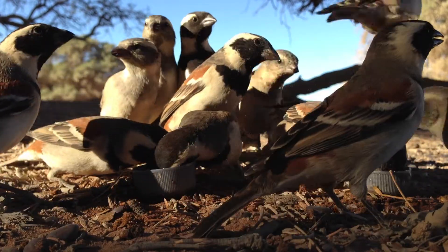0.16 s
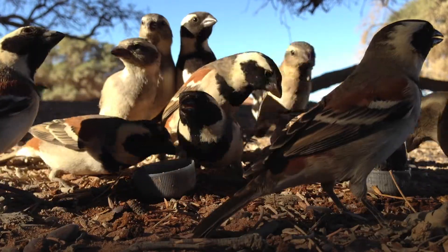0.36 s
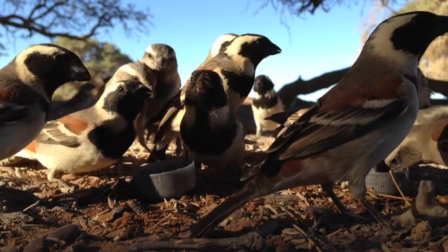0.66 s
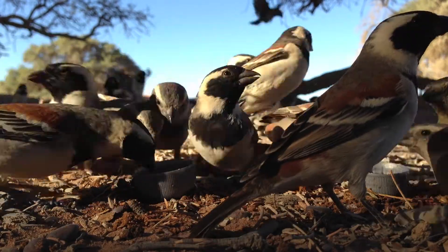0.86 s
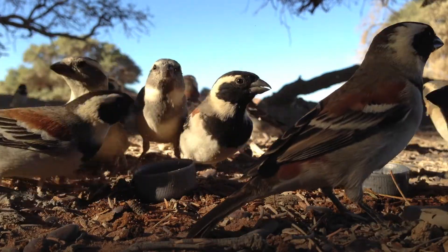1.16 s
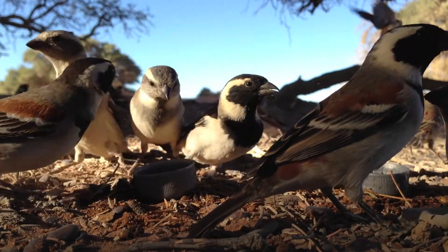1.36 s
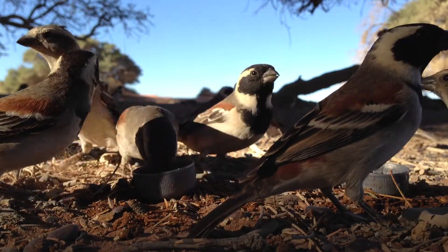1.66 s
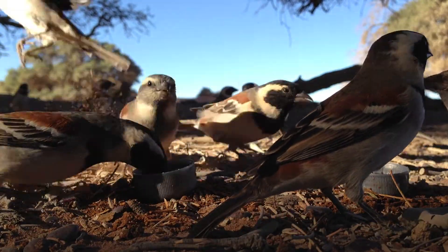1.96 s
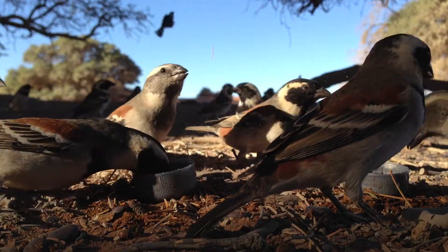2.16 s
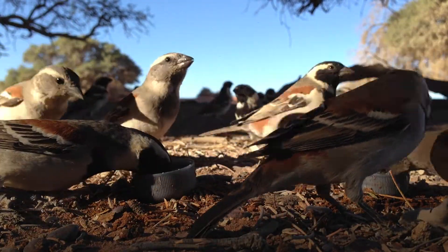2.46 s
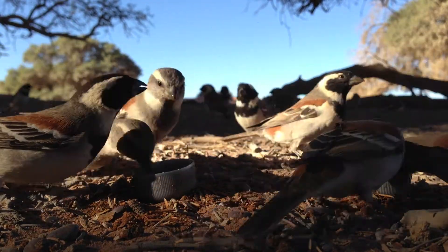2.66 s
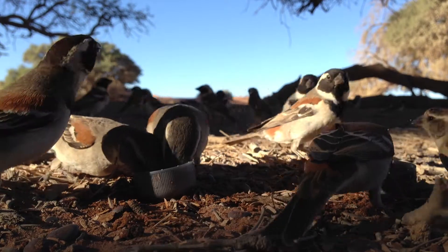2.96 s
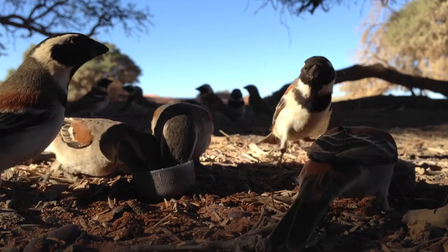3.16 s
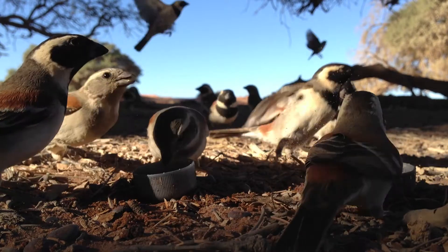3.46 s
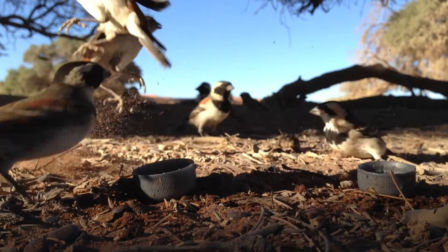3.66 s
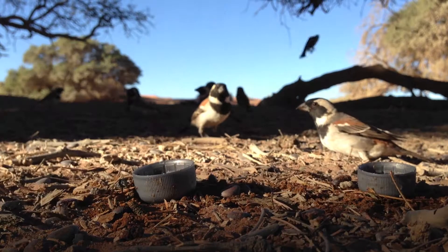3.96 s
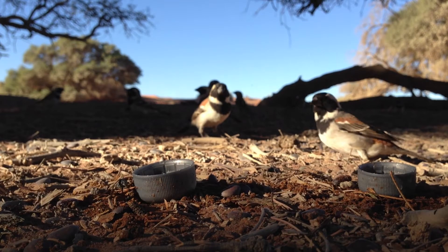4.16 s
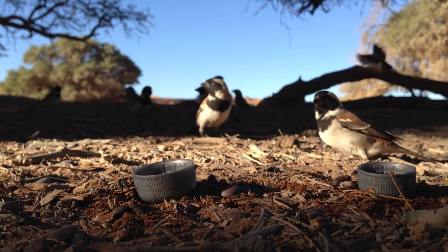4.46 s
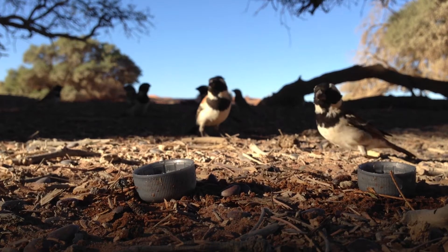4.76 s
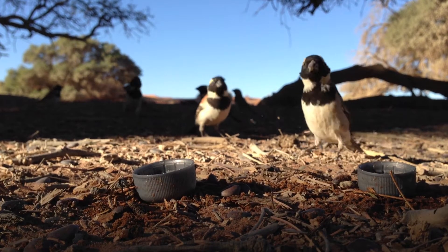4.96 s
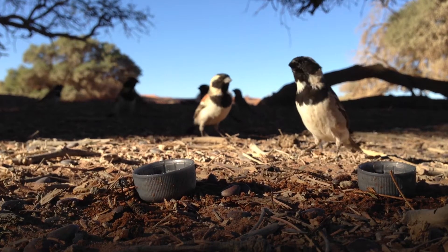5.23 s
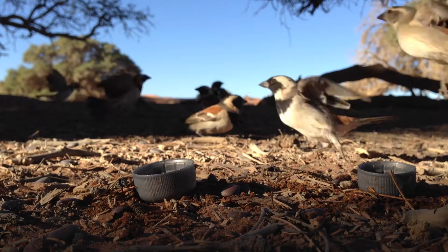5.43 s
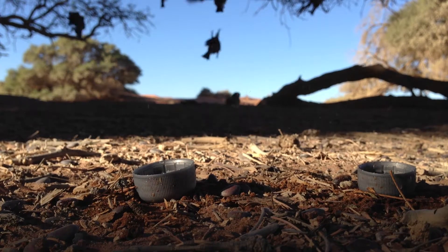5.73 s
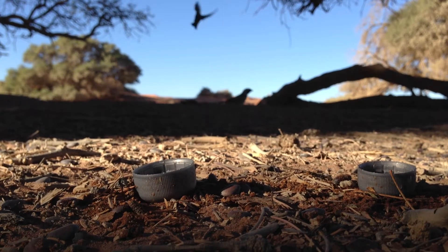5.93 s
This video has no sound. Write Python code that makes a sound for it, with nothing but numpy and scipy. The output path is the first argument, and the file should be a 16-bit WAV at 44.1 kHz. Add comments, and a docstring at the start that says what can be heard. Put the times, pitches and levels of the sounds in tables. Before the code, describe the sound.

Close, dry outdoor sound with a soft steady hiss and little deep bass. A faint swooping chirp falls and hooks up at 0.1 s; a light wing stroke follows at 0.35 and a tick at 0.7. From 0.9 to 1.2 s wings flutter near in quick low thumps with clicks, trailing off in even beats. Another flutter comes at 1.9-2.3 s, with a falling whistle near 2.2, then relative quiet and a few small ticks. At 3.5 s wings start again, swelling to a loud takeoff at 3.6-4.0: dull gusts, crackling feathers, a hard snap at 3.73. Strokes recede while thin gliding chirps sound at 4.2-4.8. At 5.04-5.3 a bird scolds in seven rough, fast-falling notes. At 5.5 a sudden bright feathery burst with snaps and a sharp chirp lasts until 5.75, then fading wingbeats and faint falling calls past 6 s.

```python
"""Sparrows feed on dry ground close to a small microphone and take off in waves.
Wings beat the air in low thumps with a rush of feathers; the many wings of the flock blur into a whirr.
Short ringing ticks are wing tips clapping and grit or seed striking.
Birds whistle gliding notes with overtones, and one scolds with rough, fast-falling notes.
Ground and branches return a short tail of the calls; a soft hiss lies under everything."""
import sys
import numpy as np
from scipy import signal
from scipy.fft import rfft, irfft
from scipy.io import wavfile
from scipy.ndimage import uniform_filter1d

SR = 44100
rng = np.random.default_rng(int(sys.argv[2]) if len(sys.argv) > 2 else 0)


def master_out(mix):
    """Clip the mix to full scale and print it as 16-bit PCM to the path in sys.argv[1]."""
    frames = np.transpose(np.atleast_2d(mix))
    ceiling = np.clip(frames, -1, 1)
    pcm = np.round(ceiling * 32767).astype(np.int16)
    wavfile.write(sys.argv[1], SR, pcm)


N = 268789  # length in samples

# Colour of the steady hiss: pitch_hz, relative level_db
HISS_COLOUR = [(70, -24), (150, -6), (400, -4), (800, -10.5), (13800, -13)]
# Colour of the air pushed by a wing: pitch_hz, relative level_db
THUMP_COLOUR = [(85, -40), (130, -3), (200, 1.5), (400, -5), (1500, -32), (5000, -95)]
# Colour of the feather rush: pitch_hz, relative level_db
RUSH_COLOUR = [(300, 3.5), (900, 4), (2500, -6.5), (4000, -15), (15000, -20)]
# The rest of the flock rising: crest_s, level_db, rise_db_per_s, fade_db_per_s, rush_db (feathers above thump)
FLOCK_WAVES = [(0.97, -55, 73, 24, 1.5), (2.0, -59, 39, 10, -4.5), (3.61, -51.5, 127, 19, 1),
               (3.799, -45, 73, 36, -5), (5.549, -44, 329, 38, -2.5)]
# How the throat colours the overtones: pitch_hz, gain_db
THROAT = [(1000, -10), (2300, 7.5), (3200, -14.5), (4200, -9.5), (6300, 3), (10800, -4), (12300, -16)]
# Shared swooping call, a long fall that hooks up again: time_s (from the bottom), pitch_hz, level_db
SWOOP_SHAPE = [(-.14, 3686, -4), (-.11, 3470, -1), (-.085, 3200, -1.5), (-.065, 2560, 1.5),
               (-.04, 1750, 2.5), (-.015, 1020, -5.5), (0, 900, -12), (0.022, 1080, -7.5),
               (0.044, 1640, -0.5), (.06, 1760, -6), (0.078, 1770, -16)]
# Each swoop: bottom_s, stretch of the fall (times), pitch factor (times), level_db,
# start_db (extra at the start), hook_db (extra on the hook), overtone_db (change per overtone)
SWOOPS = [(.113, 1.05, 0.99, -57.5, -13.5, -2.5, -7.5), (4.246, 1.17, 0.93, -62, 0, 1, -2.5),
          (5.85, 1.1, .9, -68.5, 8, 7, -2), (5.954, 1.05, 0.95, -69.5, 9, 6, -3),
          (6.11, 1.07, .93, -67, 1, 0, -14)]
# Wing tips clapping, grit and seed striking: start_s, level_db, pitch_hz
SNAPS = [(.691, -37.5, 5260), (.925, -38.5, 1940), (.9695, -31, 2680), (.9725, -35, 1490),
         (1.0355, -33, 2270), (1.1215, -33.5, 12300), (2.295, -46.5, 7500), (2.445, -46.5, 6300),
         (3.4085, -43, 6500), (3.7278, -21, 7860), (3.728, -14.5, 1530), (3.757, -31, 2520),
         (3.796, -33.5, 8700), (3.916, -29.5, 5370), (3.9275, -26, 5100), (5.538, -19, 1562),
         (5.584, -22.5, 1310), (5.633, -30, 1600), (5.674, -20.5, 1110), (5.726, -33, 2390)]
# Single near wing strokes: time_s, level_db, rush_db (feathers against the thump)
NEAR_STROKES = [(.347, -60.5, 0.5), (0.93, -42.5, -7), (.95, -42, -20), (0.971, -41, -4), (0.986, -40, -18),
                (1.022, -39.5, -17), (1.037, -44, -5), (1.064, -41, -20), (1.111, -39.5, -8.5),
                (1.162, -47, -3), (1.916, -37.5, -9), (1.96, -34.5, -9), (2.003, -40, -5),
                (2.04, -36.5, -6), (2.881, -50, -29.5), (3.045, -60, -1), (3.499, -43, -7.5),
                (3.6105, -32, -5.5), (3.652, -31, -7.5), (3.696, -33, -8.5), (3.739, -31, -7),
                (3.757, -24.5, -15), (3.769, -30, -20), (3.781, -26.5, -18), (3.818, -29, -22.5),
                (3.834, -30, -26), (3.861, -33.5, -35), (3.895, -38.5, -20), (3.953, -31.5, -31),
                (3.976, -30, -25), (4.031, -46.5, -31), (4.225, -44.5, -37), (5.476, -46, 0),
                (5.518, -41, -4.5), (5.54, -37.5, 3.5), (5.585, -34.5, -3), (5.613, -38, -1),
                (5.675, -32.5, -1.5)]
# Birds flying off with even strokes: first_s, period_s, strokes (count, fraction dropped),
# first_level_db, last_level_db, rush_db (feathers against the thump)
FLIGHTS = [(1.188, 0.042, 8.4, -46.5, -51.5, -13), (1.544, 0.039, 7.3, -54, -68, -15),
           (2.086, 0.0412, 5.26, -39.5, -48, -7), (2.296, 0.044, 14.3, -53.5, -81, -16),
           (3.349, 0.048, 3, -58, -57, -2.5), (4.082, 0.048, 9.5, -49, -56, -23.5),
           (4.531, 0.039, 10.3, -58.5, -60.5, -4.5), (5.766, 0.046, 7.2, -46, -52.5, -16)]
# Plain gliding notes: start_s, length_s, from_hz, to_hz, bend (power; above 1 the glide comes late),
# level_db (middle of the note), swell_db (over the whole note)
GLIDES = [(1.893, 0.081, 3237, 1760, 1.6, -67, 10), (3.679, 0.084, 4430, 3310, 0.44, -57, -2),
          (4.27, 0.13, 5660, 1990, 1.1, -65.5, 3), (4.431, 0.08, 5880, 4200, 1.4, -70, 6),
          (4.456, 0.081, 6700, 3230, 1.15, -65.5, 33.5), (4.624, .19, 3800, 2064, 0.79, -69.5, -3),
          (5.704, 0.085, 3410, 1674, 1.17, -54, -7), (6.042, 0.039, 2450, 2840, 0.88, -71, 2)]
# Calls that change course halfway: overtone_db (change per overtone), points (time_s, pitch_hz, level_db)
HITCHED_CALLS = [(-11, [(2.1, 3620, -63), (2.15, 3015, -61), (2.165, 3126, -51.5), (2.19, 2503, -48),
                 (2.218, 1850, -57)]), (-22, [(4.226, 5350, -64), (4.25, 4950, -62), (4.26, 5080, -67),
                 (4.31, 3800, -64)]), (-22, [(3.48, 2244, -64), (3.522, 3520, -62), (3.6, 2900, -69)]),
                 (-3.5, [(5.54, 3700, -43), (5.556, 3520, -51), (5.568, 3200, -57), (5.585, 3100, -66),
                 (5.6, 3150, -54), (5.62, 2800, -58)]), (-22, [(5.888, 3600, -61), (5.945, 2980, -61),
                 (5.98, 2340, -55), (6.028, 1250, -68)])]
# Harsh scolding notes: start_s
SCOLD_STARTS = [5.043, 5.074, 5.111, 5.149, 5.189, 5.232, 5.282]
# Colour of the open beak: pitch_hz, relative level_db
BEAK = [(1000, -36), (1450, -12), (2200, -4.5), (2900, -16.5), (3600, 1.5), (5500, -3.5), (7400, -16),
        (8500, -31), (11500, -17.5), (15000, -33)]

HISS_DB = -66
IDLE_DB = -80.5  # birds shuffling between the waves
EDGE_HZ = 15400  # upper limit of the overtones and of the final sound
FADE_S = 0.0083  # each whistled note fades in and out
THROAT_SHARE = 0.27  # the throat colours the lowest tone less than the overtones
POP_HZ = 666  # pitch of the wing snapping taut
GLIDE_OVERTONE_DB = -17.5  # change per overtone
SCOLD_DB, SHY_DB, WARM_S = -40, -17, 0.027  # the first note is soft, the run gains strength


def gain_of(db):
    """Turns decibels into a plain multiplier."""
    return 10 ** (np.asarray(db) / 20)


def evened(x):
    """Scales each row to an rms of 1."""
    return x / np.sqrt(np.mean(x ** 2, axis=-1, keepdims=True) + 1e-20)


def read(points, hz):
    """Reads a (Hz, dB) table at any pitch, in even steps of musical pitch."""
    table_hz, table_db = np.transpose(points)
    return np.interp(np.log(hz + 1), np.log(table_hz), table_db)


def coloured(x, spectrum):
    """Filters rows of x by a (Hz, dB) table."""
    size = x.shape[-1]
    gain = gain_of(read(spectrum, np.fft.rfftfreq(size, 1 / SR)))
    return irfft(rfft(x) * gain, size)


def add(mix, s, sound):
    """Lays a sound into the mix at s seconds, cut off at the end."""
    part = mix[round(s * SR):][:len(sound)]
    part += sound[:len(part)]


def crackle(shape, depth_db):
    """Feather vanes slap unevenly: a gain that jumps every millisecond or two."""
    lumps = evened(uniform_filter1d(rng.standard_normal(shape), 70))
    return evened(gain_of(depth_db * lumps))


def hiss():
    """Steady coloured noise."""
    return gain_of(HISS_DB) * evened(coloured(rng.standard_normal(N), HISS_COLOUR))


def flock():
    """Many wings out of step blur into a lumpy, crackling whirr."""
    t = np.arange(N) / SR
    lumps = gain_of(3.73 * evened(uniform_filter1d(rng.standard_normal((2, N)), 600)))
    thump = evened(coloured(rng.standard_normal(N), THUMP_COLOUR))
    rush = evened(coloured(rng.standard_normal(N), RUSH_COLOUR))
    waves = np.array([db - np.maximum(rise * (s - t), fade * (t - s))
                      for s, db, rise, fade, _ in FLOCK_WAVES])
    rush_waves = waves + np.array(FLOCK_WAVES)[:, -1:]
    # the loudest wave rules at each moment
    low_db = np.maximum(waves.max(axis=0), IDLE_DB)
    high_db = np.maximum(rush_waves.max(axis=0), IDLE_DB)
    low = gain_of(low_db) * lumps[0] * thump
    # the feathers share half of their lumps with the thumps
    high = gain_of(high_db) * np.sqrt(lumps[0] * lumps[1]) * crackle(N, 2.7) * rush
    return low + high


def chirp(overtone_db, s, hz, db):
    """A gliding whistle and its overtones pass the throat, slightly unsteady; also gives the start time."""
    t = np.arange(max(s[0], 0), s[-1], 1 / SR)
    waver = evened(uniform_filter1d(rng.standard_normal((2, len(t))), 250))
    glide_hz = uniform_filter1d(np.interp(t, s, hz), 400, mode="nearest")
    pitch = glide_hz * (1 + 0.005 * waver[0])
    turn = 2 * np.pi * np.cumsum(pitch) / SR
    tone = gain_of(THROAT_SHARE * read(THROAT, pitch)) * np.sin(turn)
    step_db = np.interp(t, s, overtone_db + np.zeros(len(s)))
    for k in range(2, 8):
        overtone_gain = gain_of((k - 1) * step_db + read(THROAT, k * pitch))
        tone = tone + overtone_gain * np.sin(k * turn) * (k * pitch < EDGE_HZ)
    fade = np.minimum(np.minimum(t - s[0], s[-1] - t) / FADE_S, 1)
    level = gain_of(np.interp(t, s, db) + 2.54 * waver[1]) * fade
    return t[0], np.sqrt(2) * level * tone


def swoop(bottom, stretch, factor, db, start_db, hook_db, overtone_db):
    """The shared swoop, its fall quicker or slower from call to call; a loud start is a purer tone."""
    s, hz, shape_db = np.transpose(SWOOP_SHAPE)
    lead = np.maximum(s / s[0], 0)  # 1 at the start, 0 from the bottom on
    hook = hook_db * (s > 0)
    times = bottom + np.where(s < 0, stretch, 1) * s
    overtones = overtone_db - 3 * max(start_db, 0) * lead ** 2 - hook
    return chirp(overtones, times, factor * hz, db + shape_db + start_db * lead + hook)


def snaps():
    """A snap is a cycle or two, then a few weaker bounces; tiny ones are scattered at random."""
    t, out = np.arange(400) / SR, np.zeros(N)
    draws = rng.random((90, 3))
    small = np.c_[draws[:, 0] * N / SR, -68 + 10 * draws[:, 1], 400 * 15 ** draws[:, 2]]
    for s, db, hz in [*SNAPS, *small]:
        # a clap is abrupt, a light or high tick rings a little
        cycles = np.clip(-db / 48 + hz / 12000, .45, 2)
        turns = hz * t - 1.435 * cycles
        cycle = np.sin(2 * np.pi * turns) * np.exp(-(turns / cycles) ** 2)
        is_bounce = rng.random(len(t)) < .1
        bounces = gain_of(-14.0 - 60 * t / 0.016) * rng.standard_normal(len(t)) * is_bounce
        bounces[0] = 1  # the first strike
        # the bright edge of the contact
        edge_noise = uniform_filter1d(rng.standard_normal(len(t)), size=2)
        crack = gain_of(-4.5 - 60 * t / 0.0019) * edge_noise
        add(out, s, gain_of(db) * np.convolve(bounces, cycle))
        add(out, s, gain_of(db) * crack)
    return out


def puffs(count, spectrum, width_s):
    """Bursts of turbulence under a bell, centred in 4096 samples, rms about 1 at the crest."""
    bell = np.exp(-.5 * ((np.arange(4096) - 2048) / SR / width_s) ** 2)
    burst = coloured(bell * rng.standard_normal((count, len(bell))), spectrum)
    return evened(burst) * np.sqrt(np.mean(bell ** 2))


def all_strokes():
    """Joins the single near strokes with the slightly uneven strokes of birds flying off."""
    strokes = list(NEAR_STROKES)
    for s, period, count, first_db, last_db, rush_db in FLIGHTS:
        wobble = rng.standard_normal((int(count), 2)) * [.003, 1.5]  # seconds, dB
        levels = np.linspace(first_db, last_db, int(count))
        for k, (late_s, extra_db) in enumerate(wobble):
            strokes.append((s + k * period + late_s, levels[k] + extra_db, rush_db))
    return strokes


def wings():
    """Each downstroke pushes a low thump of air and snaps the wing taut; feathers add a crackling rush."""
    strokes = all_strokes()
    out, count = np.zeros(N), len(strokes)
    slaps, swishes = puffs(count, RUSH_COLOUR, 0.0032), puffs(count, RUSH_COLOUR, 0.025)
    t = (np.arange(slaps.shape[1]) - slaps.shape[1] / 2) / SR
    swishes *= 1 / (1 + np.exp(-(t + 0.0068) / 0.0017))  # the swish mostly follows the stroke
    rushes = slaps * (t > -.0015) + 0.42 * swishes  # the slap starts abruptly
    rushes = 0.26 * evened(rushes * crackle(rushes.shape, 1.5))
    thumps = puffs(count, THUMP_COLOUR, 0.0061)
    for (s, db, rush_db), thump, rush in zip(strokes, thumps, rushes):
        # a dull stroke is a gust on the microphone, lower in pitch
        push_hz = max(322 + 6 * rush_db, 165)
        push = -np.cos(2 * np.pi * push_hz * t) * np.exp(-(push_hz * t / 0.76) ** 2)
        pop = -np.cos(2 * np.pi * POP_HZ * t) * np.exp(-(POP_HZ * t) ** 2)
        stroke = gain_of(rush_db + 6.5) * pop + 0.53 * thump
        stroke = stroke + (.5 - rush_db / 25) * push + gain_of(rush_db) * rush
        add(out, s + t[0], gain_of(db) * stroke)
    return out


def glide(start, length, from_hz, to_hz, bend, db, swell_db):
    """Pitch slides from one end to the other while the level swells or sinks evenly."""
    u = np.linspace(0, 1, num=12)
    pitch = from_hz + (to_hz - from_hz) * u ** bend
    return chirp(GLIDE_OVERTONE_DB, start + length * u, pitch, db + swell_db * (u - .5))


def hitched_call(overtone_db, points):
    """A whistle whose pitch and level follow a bent path from point to point."""
    return chirp(overtone_db, *np.transpose(points))


def scold():
    """A rough, fast-falling stack of overtones, mixed with noise, through the open beak."""
    t = np.arange(2048) / SR
    jitter = evened(uniform_filter1d(rng.standard_normal(len(t)), 60))
    start_hz = 1100 * rng.uniform(1.0, 1.03)
    pitch = start_hz * np.exp(-t / .019) * (1 + .06 * jitter)
    turn = 2 * np.pi * np.cumsum(pitch) / SR
    pulses = evened(sum(np.cos(k * turn + 2 * np.pi * rng.random()) for k in range(1, 17)))
    drive = pulses + .45 * rng.standard_normal(len(t))
    shape = (1 - np.exp(-t / 0.0032)) * np.exp(-(t / 0.012) ** 2)
    return shape * evened(coloured(drive, BEAK))


def scattered(x):
    """Ground and branches throw back a short, thin tail."""
    t = np.arange(8000) / SR
    tail = gain_of(-60 * t / 0.14) * rng.standard_normal(len(t)) * (t > .004)
    return signal.oaconvolve(x, tail / np.linalg.norm(tail))[:N]


def scene():
    """Adds up the hiss, the flock, the calls with their tail, the snaps and the near wings."""
    birds = np.zeros(N)
    for row in SWOOPS:
        add(birds, *swoop(*row))
    for row in GLIDES:
        add(birds, *glide(*row))
    for row in HITCHED_CALLS:
        add(birds, *hitched_call(*row))
    for s in SCOLD_STARTS:
        level_db = SCOLD_DB + SHY_DB * np.exp((SCOLD_STARTS[0] - s) / WARM_S)
        add(birds, s, gain_of(level_db) * scold())
    tail = gain_of(-9.5) * scattered(birds)
    return (hiss() + flock() + birds + tail + snaps() + wings())[None]


def record(dry):
    """The microphone drops the deepest bass; then everything above the band limit is cut."""
    bass_cut = signal.butter(3, 85, "high", fs=SR, output="sos")
    thin = signal.sosfilt(bass_cut, dry)
    treble_cut = signal.firwin(511, EDGE_HZ, window=("kaiser", 9), fs=SR)
    return signal.oaconvolve(thin, treble_cut[None], "same")


dry = scene()
out = record(dry)
master_out(out)
```